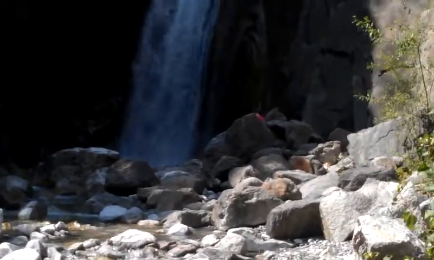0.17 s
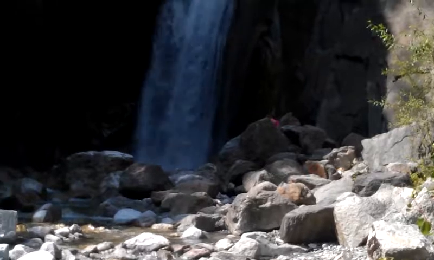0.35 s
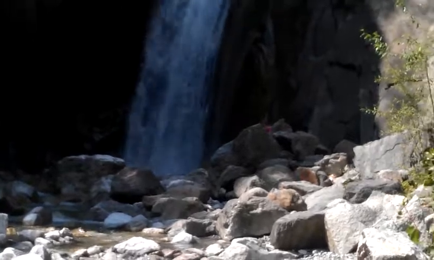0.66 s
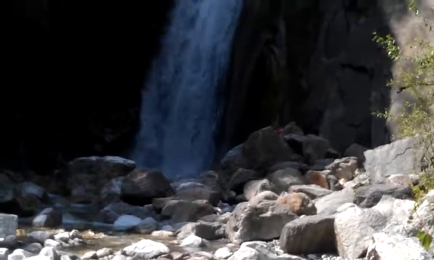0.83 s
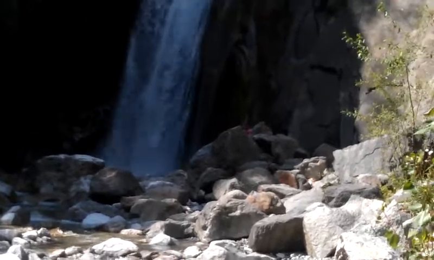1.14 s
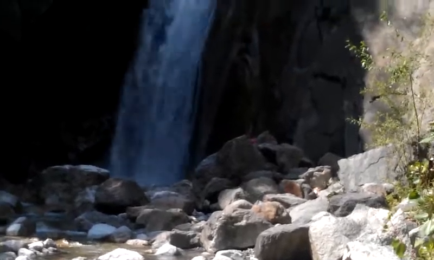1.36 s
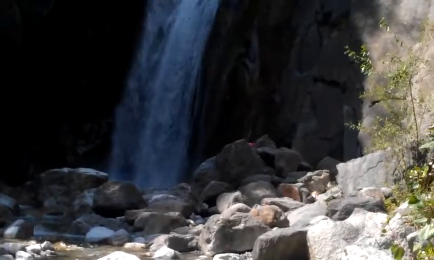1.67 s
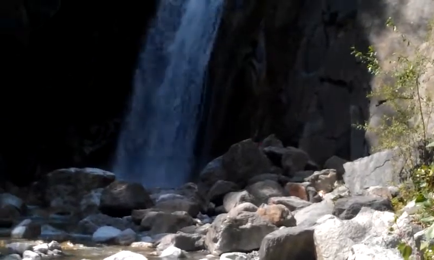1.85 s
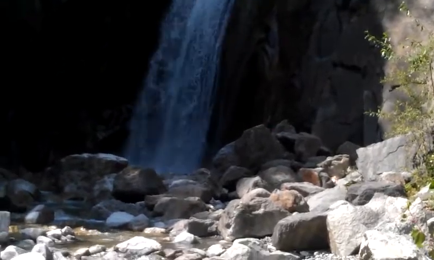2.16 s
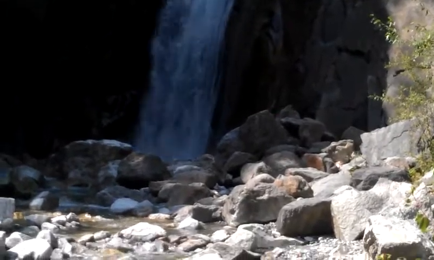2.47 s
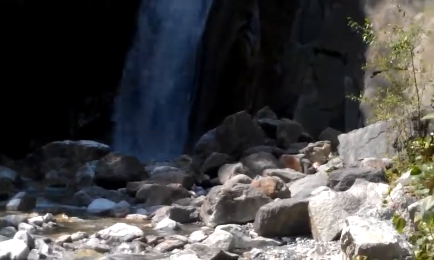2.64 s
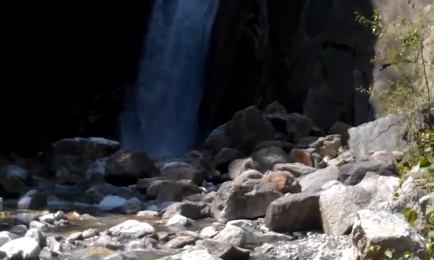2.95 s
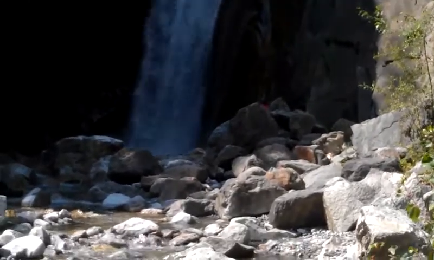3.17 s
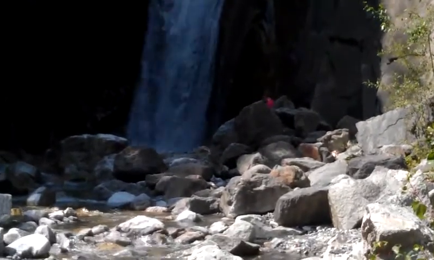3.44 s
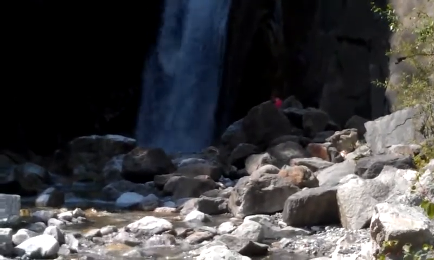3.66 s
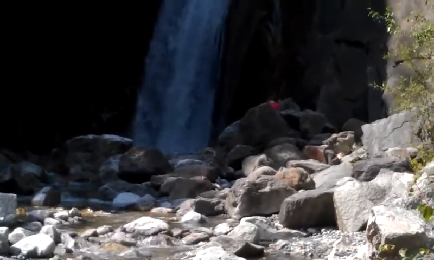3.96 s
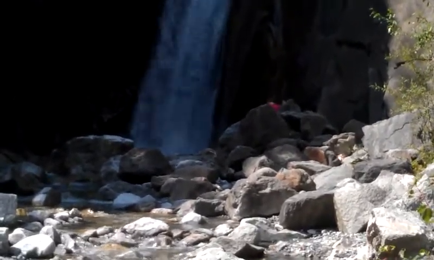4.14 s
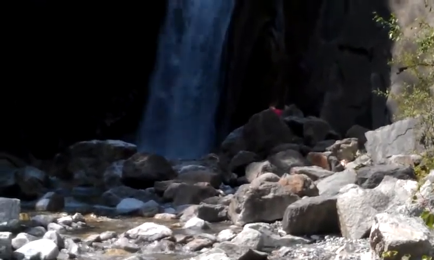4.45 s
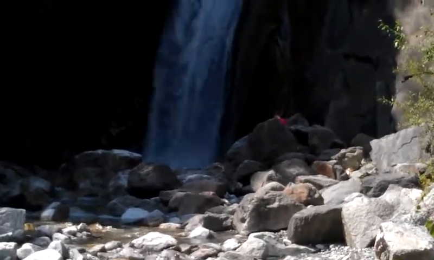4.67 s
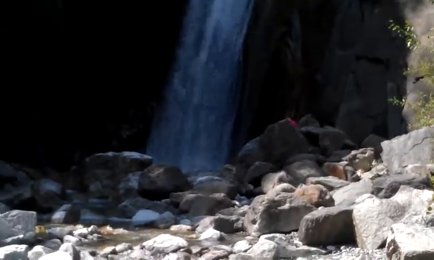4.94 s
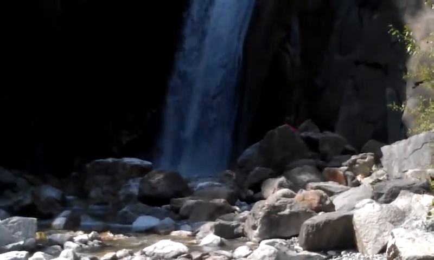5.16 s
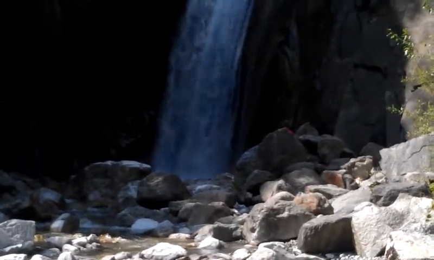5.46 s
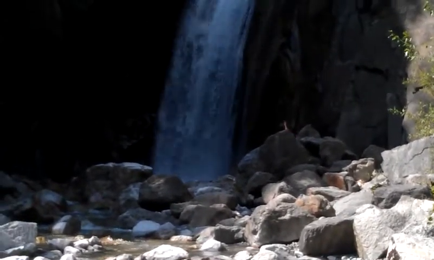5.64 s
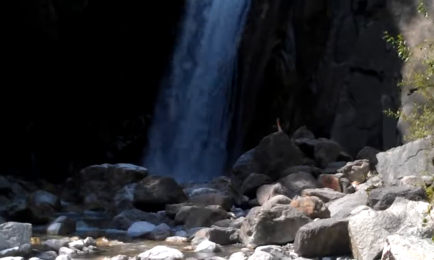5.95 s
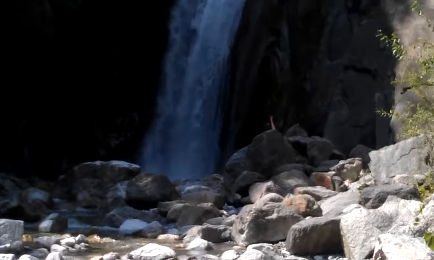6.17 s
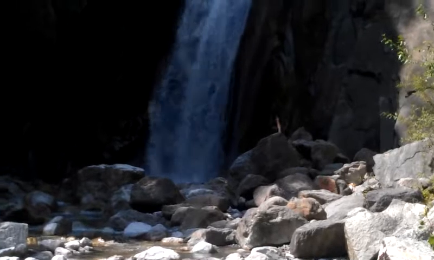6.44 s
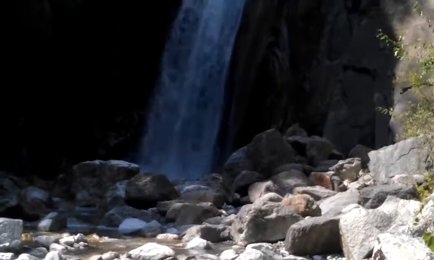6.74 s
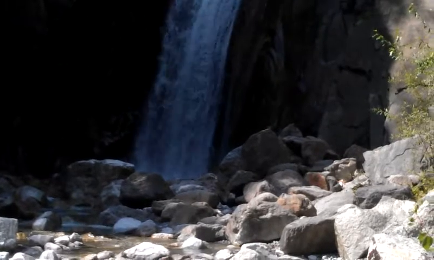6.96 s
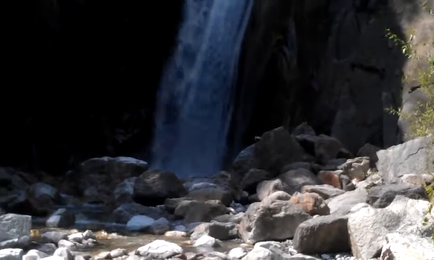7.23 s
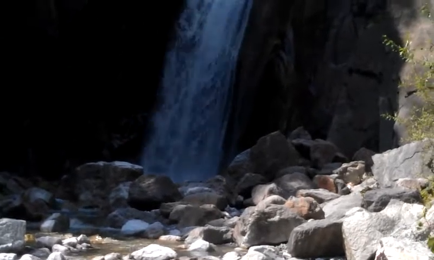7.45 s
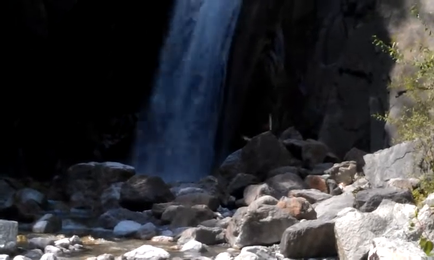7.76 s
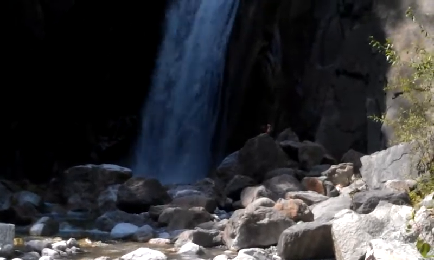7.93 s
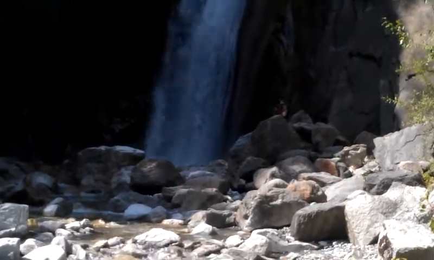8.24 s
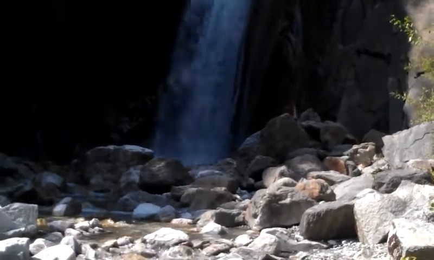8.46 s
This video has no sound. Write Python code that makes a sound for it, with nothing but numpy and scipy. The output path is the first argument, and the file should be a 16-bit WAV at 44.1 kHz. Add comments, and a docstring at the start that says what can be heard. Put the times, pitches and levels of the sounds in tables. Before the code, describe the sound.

A tall waterfall drops onto boulders at a cliff foot in one continuous, loud rush. The broad noise flutters and surges slightly as lumps of water land, with bubbles ringing in the pool, spatter on rocks and fine drops ticking in hissing spray. Occasional flat slaps and short gulps barely stand out. Outdoors, mono, from across the stream bed, with little deep bass and softened extreme treble.

```python
"""At the foot of a cliff a tall waterfall drops onto boulders, heard in mono from across the stream bed.
The falling sheet is banded noise whose levels swell as lumps land, with ringing bubbles from the pool,
splashes on the rocks and ticking drops in the hissing spray. Now and then a lump slaps flat on stone,
a big air pocket gulps or the deep bass bumps faintly; one stray drop ticks close by."""
import sys
import numpy as np
from scipy import signal
from scipy.fft import rfft, irfft, next_fast_len
from scipy.io import wavfile

SR = 44100
rng = np.random.default_rng(int(sys.argv[2]) if len(sys.argv) > 2 else 0)


def unload_wav(signal):
    """Save mono or channel-first audio to the path in sys.argv[1] as 16-bit WAV at rate SR, clipped to [-1, 1]."""
    wavfile.write(
        sys.argv[1],
        SR,
        np.round(np.clip(np.atleast_2d(signal).T, -1, 1) * 32767).astype(np.int16),
    )


N = 379260  # length in samples


def from_db(db):
    """Decibels to gain."""
    return 10 ** (np.asarray(db) / 20)


def rms_one(x):
    """Scale to unit rms."""
    return x / np.sqrt(np.mean(x ** 2) + 1e-20)


def at_hz(points, hz):
    """Read a (Hz, value) table on a log-frequency axis."""
    points = np.array(points)
    return np.interp(np.log(hz + 1), np.log(points[:, 0]), points[:, 1])


def butter(x, hz, kind, order=2):
    """Butterworth filter."""
    safe_hz = np.clip(hz, 0.5, 0.49 * SR)
    sos = signal.butter(order, safe_hz, kind, fs=SR, output="sos")
    return signal.sosfilt(sos, x + 1e-18)


def shaped(x, db_at):
    """Filter by a gain in dB given as a function of frequency."""
    size = next_fast_len(N + SR // 10)
    hz = np.arange(size // 2 + 1) * SR / size
    return irfft(rfft(x, size) * from_db(db_at(hz)), size)[:N]


def flutter(rate):
    """Quick chance of spread 1 that swings about `rate` times a second and never lingers."""
    # drawn at 1/40 of the sample rate, so the band is 40 times too high here; the filter's start is dropped
    quick = butter(rng.standard_normal(N // 40 + 2002), [20 * rate, 80 * rate], "band")[2000:]
    return np.interp(np.arange(N) / 40, np.arange(len(quick)), rms_one(quick))


# Dull bumps in the deep bass. Each row: start in seconds, relative level in dB.
BASS_BUMPS = [(0.03, -66), (0.39, -60), (0.549, -63), (0.639, -62), (0.725, -61), (0.929, -60),
              (1.329, -62), (1.47, -59), (1.609, -63), (2.109, -58.5), (2.279, -59), (3.37, -63),
              (3.565, -67), (4.089, -65), (4.63, -62), (5.229, -59), (6.369, -64), (6.5, -64), (6.999, -64),
              (7.62, -59), (7.839, -64), (8.079, -59), (8.249, -57)]


def bass_bumps(bump_db=5, fade_s=0.046, top_hz=85, rumble_db=-82.5, uneven_db=13, rumble_rate=4.0,
               rumble_low_hz=65, rumble_high_hz=125):
    """The deep bass bumps faintly; a still fainter rumble comes and goes, with near silence between."""
    push = np.zeros(N)
    for s, level_db in BASS_BUMPS:
        push[int(s * SR)] = from_db(level_db + bump_db)
    # each push dies away exponentially
    push = signal.lfilter([1], [1, -np.exp(-1 / (fade_s * SR))], push + 1e-18)
    bumps = push / 2 * rms_one(butter(rng.standard_normal(N), top_hz, "low"))
    rumble = rms_one(butter(rng.standard_normal(N), [rumble_low_hz, rumble_high_hz], "band", order=1))
    swing_db = uneven_db * np.tanh(flutter(rumble_rate))
    return bumps + from_db(rumble_db + swing_db) * rumble


def droplets(spray_db, per_s=2600, size_db=3.2, clump_db=0.5, clump_rate=30, low_hz=1200):
    """Drops tick on the nearer stones in clumps, more thickly when the spray swells."""
    thickness = from_db(2 * spray_db + clump_db * flutter(clump_rate))
    born = rng.random(N) < per_s / SR * thickness
    sizes = from_db(size_db * np.minimum(rng.exponential(1, N), 4))
    ticks = born * sizes * rng.choice([-1, 1], N)
    return rms_one(butter(ticks, low_hz, "high"))


def spatter(per_s=70, low_hz=900, high_hz=5500, length_s=0.014, size_db=2.0, count=6):
    """Stray clots of water burst on the nearer stones: brief splashes, each with its own size, length and pitch."""
    envelopes = np.zeros((count, N + SR))
    for when, pitch, size, life in rng.random((int(per_s * N / SR), 4)):
        hump = np.hanning(int(length_s * (0.5 + life) * SR))
        start = int(when * N)
        level_db = -size_db * np.log(size + 0.1)
        envelopes[int(pitch * count), start:start + len(hump)] += hump * from_db(level_db)
    out = np.zeros(N)
    for envelope, hz in zip(envelopes[:, :N], np.geomspace(low_hz, high_hz, count)):
        octave = [hz / np.sqrt(2), hz * np.sqrt(2)]
        out += envelope * rms_one(butter(rng.standard_normal(N), octave, "band"))
    return rms_one(out)


def near_drop(drop_s=7.7726, drop_db=-10, low_hz=9000, fade_s=0.001):
    """A single drop lands close by: a tiny tick of noise, brighter than the distant spray."""
    age = np.arange(N) / SR - drop_s
    tick = (age >= 0) * np.exp(-np.abs(age) / fade_s)
    return from_db(drop_db) * tick * rms_one(butter(rng.standard_normal(N), low_hz, "high", order=4))


def bubbles(plunge_db, per_s=220, low_hz=340, high_hz=2600, cycles=12, rise=0.14, size_db=3.5):
    """Trapped air rings for some cycles, rising in pitch as it nears the surface."""
    out = np.zeros(N)
    for when, pitch, size, life in rng.random((int(per_s * N / SR), 4)):
        start = int(when * N)
        hz = low_hz * (high_hz / low_hz) ** pitch
        t60 = cycles * (1 + 2 * life) / hz  # seconds to fade by 60 dB
        t = np.arange(min(int(t60 * SR), N - start)) / SR
        level_db = -size_db * np.log(size + 0.02) - 60 * t / t60
        ring = np.sin(2 * np.pi * hz * t * (1 + rise * t / t60))
        out[start:start + len(t)] += np.sqrt(hz) * from_db(level_db) * ring
    return rms_one(out) * from_db(plunge_db)


# Big air pockets in the pool.
# Each row: time of the fullest swell in seconds, relative level in dB, centre in Hz,
# time either side to fall to 1/e in seconds.
AIR_POCKETS = [(0.912, -4.5, 850, 0.03), (3.055, -12, 450, 0.034), (4.082, -9, 856, 0.016),
               (4.163, -10, 330, 0.03), (5.3, -12, 480, .022), (6.633, -14, 322, 0.044)]


def gulps(spread=1.13):
    """A big air pocket breaks into a loose cloud of bubbles around one size: a short burbling swell."""
    out, t = np.zeros(N), np.arange(N) / SR
    for s, level_db, hz, length in AIR_POCKETS:
        cloud = rms_one(butter(rng.standard_normal(N), [hz / spread, hz * spread], "band"))
        out += from_db(level_db) * cloud * np.exp(-((t - s) / length) ** 2)
    return out


# Lumps of water slapping flat on stone.
# Each row: start in seconds, relative level in dB, centre in Hz, fade time constant in seconds.
STONE_SLAPS = [(0.405, -5, 5000, 0.014), (2.053, -10, 3200, 0.044), (2.272, -8, 6000, .03),
               (4.585, -6.5, 4500, 0.02), (4.77, -7.5, 4000, 0.039), (8.245, -14, 1490, .025),
               (8.481, -15, 900, 0.0074)]


def slaps(swell=0.1):
    """A lump flattens on stone: a broad burst that swells in a fraction of its fade time and dies."""
    out, white = np.zeros(N), rng.standard_normal(N)
    for s, level_db, hz, fade in STONE_SLAPS:
        span = slice(int(s * SR), min(int(s * SR) + SR // 4, N))
        age = np.arange(span.stop - span.start) / (SR * fade)  # in fade times
        burst = (1 - np.exp(-age / swell)) * np.exp(-age)
        noise = rms_one(butter(white[span], [hz / 2, hz * 2], "band"))
        out[span] += from_db(level_db) * burst / burst.max() * noise
    return out


def lumps_landing(per_s, swell_s, settle_hz=4.1):
    """Lumps land at random, each swelling and dying away; their quick swing about the mean flow, spread 1."""
    landings = rng.poisson(per_s / SR, N + SR) - per_s / SR
    keep = np.exp(-1 / (swell_s * SR))
    load = signal.lfilter([1], [1, -2 * keep, keep ** 2], landings)
    return rms_one(butter(load, settle_hz, "high")[SR:])  # the first second settles the filters


def swell_db(rows, depth):
    """Slow swing of a level about its mean, scaled by depth."""
    s, db = np.transpose(rows)
    level = np.interp(np.arange(N) / SR, s, db)
    return depth * (level - level.mean())


# Slow swells of the water; only the swing about the mean counts.
# Each row: time in seconds, level in dB before the depth scaling.
ROAR_SWELL = [(0.0, -34.5), (1.4, -34), (2.46, -35.5), (3.02, -30), (4.0, -35.5), (4.16, -29),
              (4.68, -31.5), (5.3, -33), (5.55, -31), (6.14, -37.5), (6.62, -31.5), (7.28, -35),
              (7.54, -30.5), (7.76, -39), (7.88, -33.5), (8.6, -34)]  # deep roar of the pool
PLUNGE_SWELL = [(0.0, -26), (0.4, -27.5), (1.86, -28), (2.3, -24.5), (2.68, -27.5), (2.94, -26.5),
                (4.66, -28.5), (5.8, -26), (6.36, -29), (6.62, -27), (6.96, -28.5), (7.3, -28),
                (7.38, -26.5), (7.78, -27.5), (8.3, -26), (8.6, -28)]  # water plunging into the pool
SPLASH_SWELL = [(0.0, -24), (0.3, -23.5), (1.96, -25), (2.08, -21.5), (2.78, -22.5), (2.96, -21.5),
                (3.98, -22.5), (4.46, -20.5), (4.92, -23.5), (5.46, -21), (5.82, -24), (6.72, -23.5),
                (6.84, -21.5), (7.02, -23), (7.52, -19.5), (7.72, -23.5), (8.3, -21.2), (8.6, -25)]  # water splashing on the rocks
SPRAY_SWELL = [(0.0, -20.5), (0.42, -17.5), (0.84, -17), (1.02, -19.5), (1.42, -16), (1.84, -18.5),
               (2.1, -18), (2.66, -19), (3.38, -18.0), (3.96, -20), (4.08, -19.5), (5.36, -18), (5.76, -21),
               (6.38, -18.5), (6.7, -21), (6.78, -19), (8.32, -18.5), (8.6, -20)]  # hissing spray
MIST_SWELL = [(0.0, 0.5), (1.4, 1), (2.8, 0.5), (4.3, 1), (4.6, 1), (5.8, 2.5), (7.2, 2.5), (7.7, 3),
              (8.6, -0.5)]  # highest treble against the rest of the spray


def surging(roar_db=1.5, plunge_db=0.5, splash_db=1.17, spray_db=0.74, mist_db=0.87, rock_share=0.23):
    """Swing in dB of roar, plunge, splash, spray and mist: slow swells plus quick jumps, mostly landing lumps."""
    on_rocks = lumps_landing(per_s=110, swell_s=0.012)
    # part of the spray's quick swing follows the lumps on the rocks
    other_lumps = lumps_landing(per_s=91, swell_s=0.0096)
    thrown = rock_share * on_rocks + np.sqrt(1 - rock_share ** 2) * other_lumps
    spray = swell_db(SPRAY_SWELL, depth=0.99) + spray_db * thrown
    roar = swell_db(ROAR_SWELL, depth=0.83) + roar_db * lumps_landing(per_s=40, swell_s=0.0054)
    plunge = swell_db(PLUNGE_SWELL, depth=0.98) + plunge_db * lumps_landing(per_s=80, swell_s=0.014)
    splash = swell_db(SPLASH_SWELL, depth=1.0) + splash_db * on_rocks
    mist = spray + swell_db(MIST_SWELL, depth=1.0) + mist_db * flutter(8.2)
    return np.array([roar, plunge, splash, spray, mist])


def surge_db(surges, hz, roar_hz=300, pool_hz=700, rock_hz=2100, spray_hz=5200, mist_hz=11000):
    """Swell at one pitch: roar and pool rule the lows, the rocks the middle, spray and mist the top."""
    homes = np.log([roar_hz, pool_hz, rock_hz, spray_hz, mist_hz])
    shares = np.array([np.interp(np.log(hz), homes, row) for row in np.eye(len(homes))])
    return shares @ surges


def passing_db(rows, hz, reach_octaves=0.99):
    """Each gush or lull comes and goes in a smooth hump, strongest at its own pitch."""
    out = np.zeros(N)
    for s, db, centre_hz, length_s in rows:
        hump = np.hanning(int(length_s * SR))
        start = max(int(s * SR) - len(hump) // 2, 0)
        nearness = np.exp(-(np.log2(hz / centre_hz) / reach_octaves) ** 2)
        out[start:start + len(hump)] += db * nearness * hump[:N - start]
    return out


# Heavier gushes of water.
# Each row: middle in seconds, lift at the centre pitch in dB, centre in Hz, length in seconds.
HEAVY_GUSHES = [(0.315, 4, 1800, .06), (0.44, 5, 950, 0.18), (0.68, 2.5, 850, .1), (0.84, 6, 1600, 0.049),
                (1.25, 5, 1800, 0.07), (1.52, 4, 330, .09), (1.66, 4, 1800, 0.15), (1.92, 5, 330, 0.17),
                (2.22, 3, 1700, .07), (2.32, 2.3, 9000, 0.12), (2.93, 4, 1100, .07), (3.05, 5, 5500, 0.044),
                (3.17, 3.5, 1800, .07), (3.33, 5, 2000, .06), (3.6, 3.5, 1800, .13),
                (3.72, 6.5, 1900, 0.045), (3.75, 2.2, 10000, .13), (3.78, 6, 1300, 0.05),
                (4.11, 4.5, 7000, 0.066), (4.165, 7, 130, .08), (4.19, 3, 2500, 0.1),
                (4.225, 3.5, 5500, 0.059), (4.39, 4, 2500, 0.045), (4.65, 1, 11000, 0.21),
                (4.97, 4, 550, 0.14), (5.11, 5.5, 2110, .09), (5.225, 14, 136, .09),
                (5.355, 4.5, 2000, 0.07), (5.36, 15, 120, .16), (5.61, 3, 10000, 0.046),
                (5.74, 2.5, 10000, .06), (5.8, 2.5, 600, .18), (6.13, 6.5, 1900, 0.049),
                (6.335, 3.5, 3400, 0.13), (6.45, 8, 140, .07), (6.49, 4, 650, 0.077), (6.6, 2.5, 5500, .13),
                (6.785, 2.5, 2800, .07), (6.82, 5, 750, .09), (6.912, 5, 2700, 0.047),
                (7.19, 5.5, 700, 0.083), (7.405, 2.3, 700, .06), (7.445, 3.5, 2300, 0.056),
                (7.5, 4.5, 340, .11), (7.68, 4.3, 1300, 0.11), (7.89, 6.5, 300, .09),
                (7.93, 2.5, 2000, .06), (8.13, 5.5, 2500, 0.062), (8.27, 4, 850, 0.11),
                (8.28, 3.5, 8000, 0.15)]
# Lulls where the sheet thins.
# Each row: middle in seconds, dip at the centre pitch in dB, centre in Hz, length in seconds.
THIN_LULLS = [(0.06, 5, 1800, .11), (0.16, 5, 5000, .06), (0.23, 4, 4000, .06), (0.36, 12, 120, 0.25),
              (0.58, 4, 600, 0.09), (1.02, 2, 8000, 0.091), (1.3, 9, 170, 0.21), (1.72, 6, 2500, 0.04),
              (1.85, 0, 750, .09), (2.1, 12, 450, 0.073), (2.235, 3, 5500, .06), (2.45, 4, 900, .13),
              (2.62, 2, 10000, 0.071), (2.86, 5, 900, 0.048), (3.25, 2.5, 3500, .06), (3.7, 9, 130, .12),
              (3.83, 4, 3000, 0.075), (3.94, 3, 2400, .12), (4.28, 6.5, 1300, 0.1), (4.48, 8, 700, 0.064),
              (4.645, 11, 1150, 0.075), (4.93, 4, 2500, 0.1), (5.06, 2, 1600, .04), (5.19, 5, 6000, 0.075),
              (5.24, 3, 1500, 0.31), (5.83, 1.2, 5000, .16), (5.86, 8, 130, 0.16), (6.23, 2.5, 7000, .15),
              (6.35, 4, 550, .13), (6.53, 2.5, 3500, .09), (6.69, 4.7, 2100, 0.083),
              (6.69, 1, 10000, 0.063), (6.97, 8, 1400, .06), (7.04, 3.5, 7000, 0.11), (7.22, 2, 5500, .06),
              (7.27, 8, 520, 0.11), (7.37, 5, 5000, 0.091), (7.44, 19, 130, 0.18), (7.7, 3, 7000, 0.1),
              (7.79, 4.5, 560, 0.22), (7.98, 4, 10000, .09), (8.19, 6, 1800, 0.11), (8.45, 5, 1300, .06)]


def churn(surges, bass_patch_db=5.0, roar_patch_db=1.9, low_patch_db=1.1, high_patch_db=0.8, patch_rate=17,
          lump_db=0.08, lump_rate=22, count=21):
    """Countless far impacts merge into noise; lumps lift all pitches a little and neighbouring bands more."""
    edges = np.geomspace(90, 18000, count + 1)
    white = rng.standard_normal((2, N))  # neighbouring bands take turns with two noises
    lumps, below = flutter(lump_rate), flutter(patch_rate)
    # big cavities are few, so the lows are more uneven than the fine spray
    unevenness = [(120, bass_patch_db), (220, roar_patch_db), (1300, low_patch_db), (6000, high_patch_db)]
    out = np.zeros(N)
    for k, (low, high) in enumerate(zip(edges, edges[1:])):
        hz = np.sqrt(low * high)
        above = flutter(patch_rate)
        patch = (below + above) / np.sqrt(2)  # each band shares a flutter with the next
        level_db = surge_db(surges, hz) + lump_db * lumps + at_hz(unevenness, hz) * patch
        level_db += passing_db(HEAVY_GUSHES, hz) - passing_db(THIN_LULLS, hz)
        out += butter(white[k % 2], [low, high], "band") * from_db(level_db)
        below = above
    return rms_one(out)


# Broad colour of the rush. Each row: pitch in Hz, relative gain in dB.
RUSH_COLOUR = [(60, -60), (108, -37), (144, -29.5), (278, -5), (524, -1), (923, -1), (1240, -3.5),
               (2990, -2.5), (3670, -1), (5640, -1), (6750, -2), (7740, -5), (11100, -10.5), (15600, -26)]
# Peaks and dips of the microphone port. Each row: centre in Hz, width in Hz, gain in dB.
PORT_RIPPLES = [(2950, 740, 2), (3660, 450, -3.5), (5670, 680, 2), (6810, 600, -2.5), (7680, 610, 2.5),
                (15300, 1500, 3.5)]


def rush_colour_db(hz):
    """Broad colour of the water with the ripples of the microphone port."""
    colour_db = at_hz(RUSH_COLOUR, hz)
    for centre, width, db in PORT_RIPPLES:
        colour_db = colour_db + db * np.exp(-2 * ((hz - centre) / width) ** 2)
    return colour_db


def scene(rush_db=-19, bubble_db=-16.5, droplet_db=-11, spatter_db=-17.0, slap_db=5.0, gulp_db=-3,
          low_cut_hz=133):
    """The water shares one colour; the near drop and bass bumps join it, all in the middle."""
    surges = surging()
    _, plunge_db, splash_db, spray_db, _ = surges
    # layer levels are against the churn, before the colour
    grains = from_db(bubble_db) * bubbles(plunge_db)
    grains += from_db(droplet_db) * droplets(spray_db)
    grains += from_db(spatter_db + splash_db) * spatter()
    lumps = from_db(slap_db) * slaps() + from_db(gulp_db) * gulps()
    coloured = shaped(churn(surges) + grains + lumps, rush_colour_db)
    water = rms_one(butter(coloured, low_cut_hz, "high", order=6))
    mono = from_db(rush_db) * water + near_drop() + bass_bumps()
    return np.tile(mono, (2, 1))


def record(dry, cutoff_hz=15750):
    """The top is cut steeply by an elliptic low-pass."""
    sos = signal.ellip(14, 0.1, 90, cutoff_hz, fs=SR, output="sos")
    return signal.sosfilt(sos, dry)


dry = scene()
out = record(dry)
unload_wav(out)
```